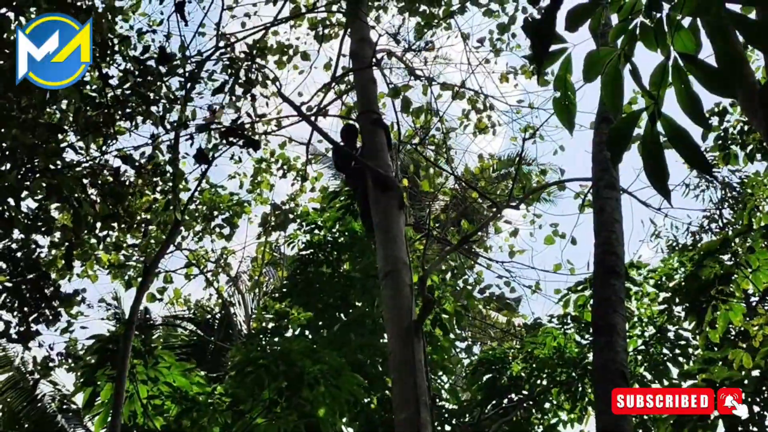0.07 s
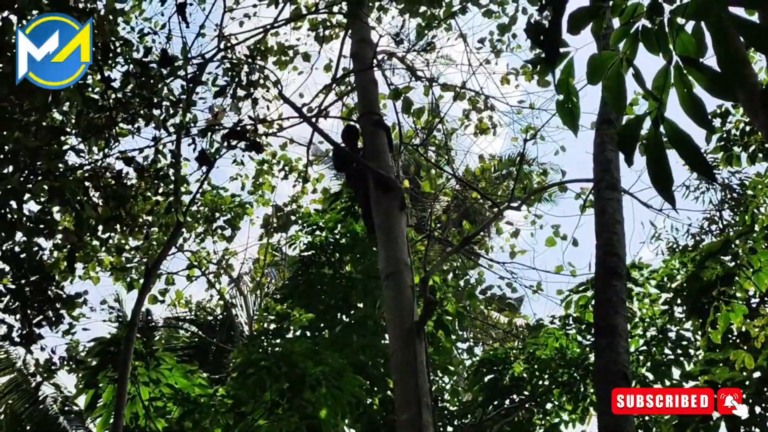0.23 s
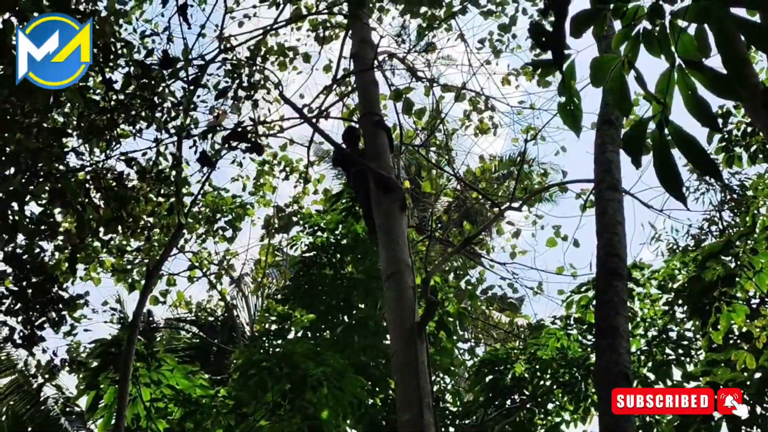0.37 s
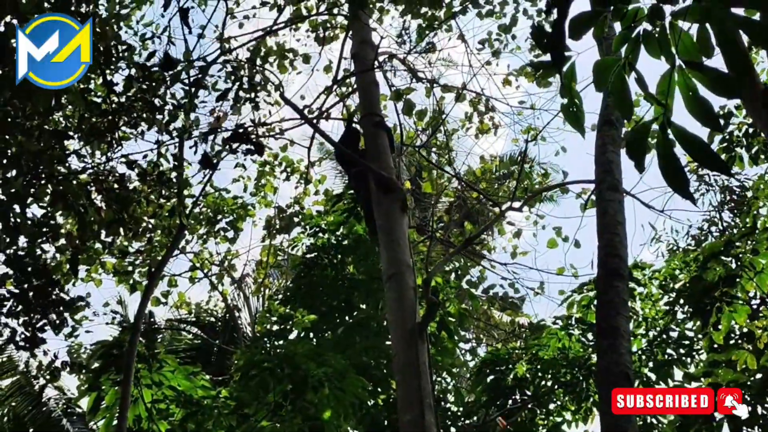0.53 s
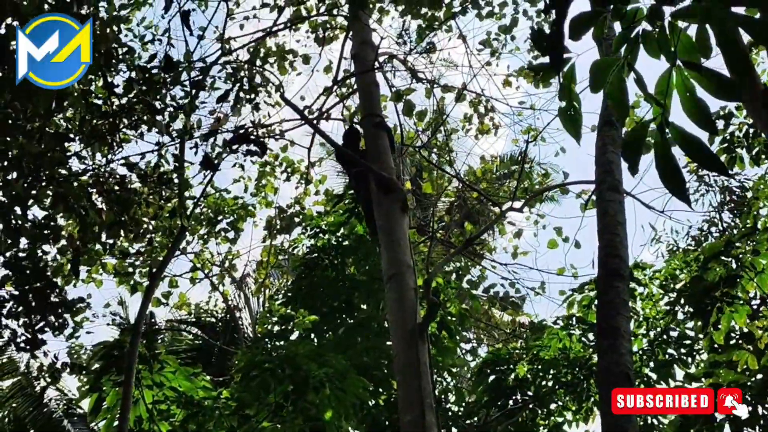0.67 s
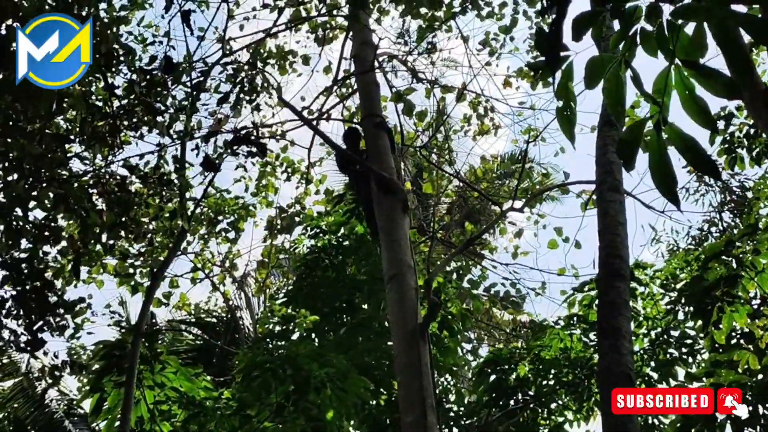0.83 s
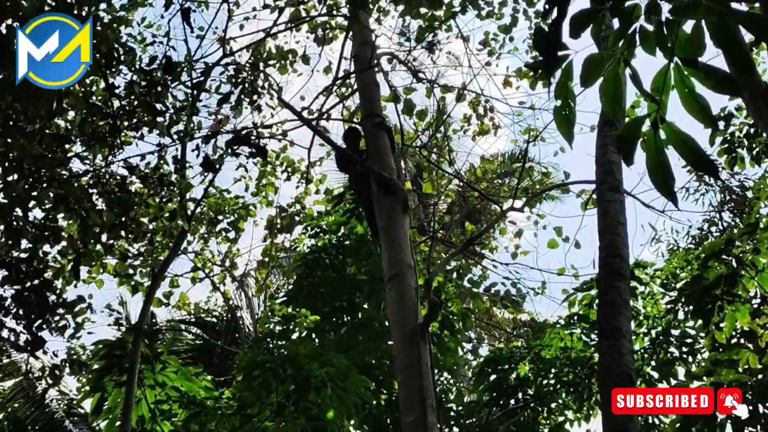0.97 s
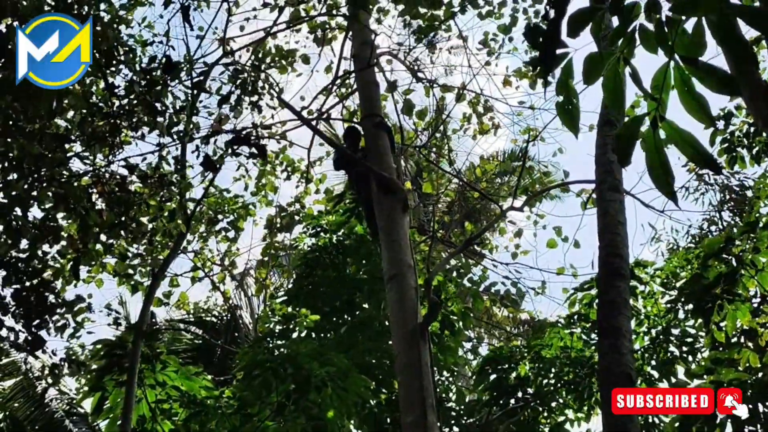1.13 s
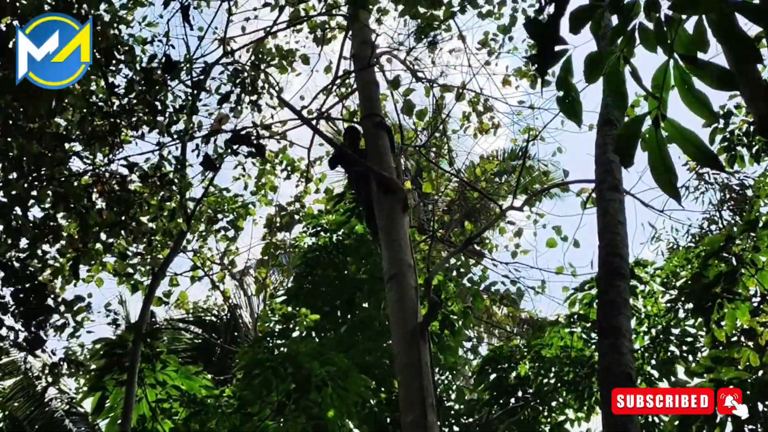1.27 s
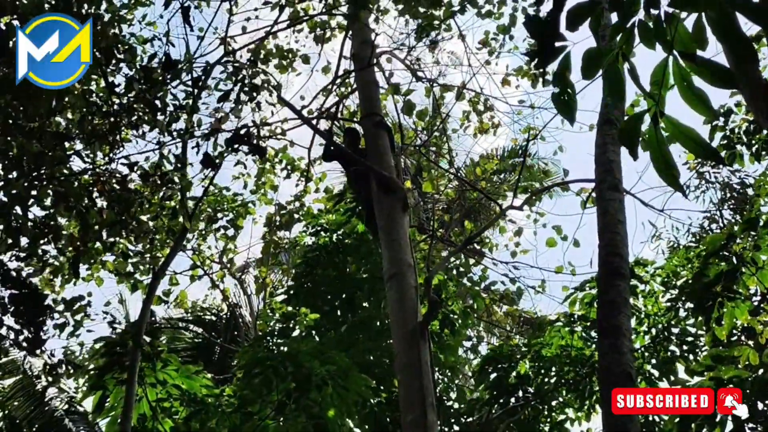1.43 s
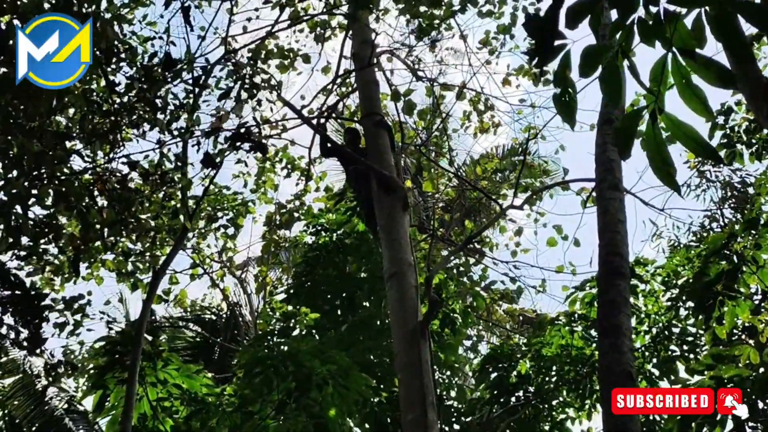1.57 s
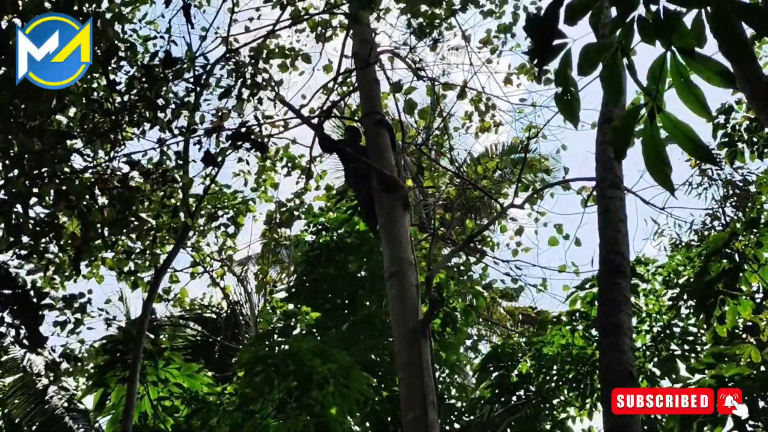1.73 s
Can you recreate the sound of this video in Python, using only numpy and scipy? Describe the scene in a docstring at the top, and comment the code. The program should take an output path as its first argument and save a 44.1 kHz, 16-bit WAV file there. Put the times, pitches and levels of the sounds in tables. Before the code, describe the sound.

Two sharp, woody blade chops in a tree, the first much louder and slightly clipped, each with a forest echo tail; steady high cicada hiss, faint leaf rustle and twig ticks, on a handheld stereo recorder.

```python
"""A blade chops twice into a limb in a tree: the trunk booms, branch and limb knock, fibres crack.
Each knock, early echo included, is decaying modes and a noise burst; the forest adds a diffuse noise tail.
Around it, coloured noise makes cicada hiss, far air, rustling leaves and a low rumble.
Twigs and leaves tick faintly as short noise bands; something taps the right microphone port once.
The handheld recorder has two unlike ports and clips on strong peaks."""
import sys
import numpy as np
from scipy import signal
from scipy.fft import rfft, irfft, next_fast_len
from scipy.io import wavfile
from scipy.ndimage import uniform_filter1d, map_coordinates

SR = 44100
rng = np.random.default_rng(int(sys.argv[2]) if len(sys.argv) > 2 else 0)


def to_wav(s):
    """Save 16-bit WAV."""
    ch = np.atleast_2d(s).T  # columns
    pcm = np.round(np.clip(ch, -1, 1) * 32767)  # PCM
    wavfile.write(sys.argv[1], SR, pcm.astype(np.int16))


def boost(x):
    """Linear amplitude factor 10**(x/20) for a level x in decibels (scalar or array-like)."""
    u = np.asarray(x, float) / 20
    return 10 ** u


N = 79380  # samples, 1.8 s

# Knocks of blade on wood in two blows; rows .2413 and .2445 are the first blow's early echo.
# Each row: start in seconds, then levels of trunk, thick branch, thin limb and crack in dB.
KNOCKS = [(0.2031, -65, -28, -27, -39), (0.2105, -56, -18, -17, -26), (0.213, -27, -4.5, -15.5, -7.5),
          (0.2153, -28, -6, -16, -10.5), (0.2214, -49, -31, -11.5, -12.5), (.2320, -18, -30, -24, -16),
          (0.2413, -22.5, -19.5, -34, -28), (.2445, -37, -16.5, -26, -25), (0.934, -41, -42, -23.5, -50),
          (0.9422, -26, -26, -11.5, -38), (.9462, -17, -20.5, -10, -7), (0.9496, -22, -16, -16.5, -14),
          (0.9584, -15, -21.5, -16, -22)]


def unit(x):
    """Scale to rms 1."""
    return x / np.sqrt(np.mean(x ** 2) + 1e-20)


def along(points, hz):
    """Read a curve of (Hz, value) points on a log frequency axis."""
    f, v = np.transpose(points)
    return np.interp(np.log(hz + 1), np.log(f + 1), v)


def level(rows):
    """Gain per sample from (seconds, dB) rows."""
    s, db = np.transpose(rows)
    return boost(np.interp(np.arange(N) / SR, s, db))


def wobble(rate):
    """A smooth random curve with rate knots a second."""
    knots = rng.standard_normal(int(N * rate / SR) + 4)
    return map_coordinates(knots, [np.arange(N) * rate / SR])


def filtered(x, response):
    """Multiply the spectrum of x by a response of frequency, without phase shift."""
    n = x.shape[-1]
    m = next_fast_len(n + 8192)  # room for the filter's ringing
    return irfft(rfft(x, m) * response(np.fft.rfftfreq(m, 1 / SR)), m)[..., :n]


def spread(pair, colour, alike):
    """Two unrelated signals, as mid and side, become a coloured left and right of given likeness."""
    def mid_side_gains(hz):
        turn = np.arccos(np.clip(along(alike, hz), -1, 1)) / 2
        return boost(along(colour, hz)) * [np.cos(turn), np.sin(turn)]

    mid, side = filtered(pair, mid_side_gains)
    return np.array([mid + side, mid - side])


def rush(colour, patchy_db, grit=0):
    """Stereo noise of rms 1 with patches of random gain in time and frequency, plus optional grit."""
    # Likeness of the two ports in diffuse sound. Each row: Hz, left-right correlation.
    port_likeness = [(60, 0.12), (180, 0.85), (540, 0.35), (1630, -0.048), (4880, 0.22), (14700, -0.16)]
    z = signal.stft(rng.standard_normal((2, N)) + grit, nperseg=512)[2]
    field = rng.standard_normal(z.shape[1:])
    field = uniform_filter1d(uniform_filter1d(field, 6, 0), 10, 1)
    patchy = signal.istft(z * boost(patchy_db * unit(field)), nperseg=512)[1][:, :N]
    return unit(spread(patchy, colour, port_likeness))


def add(out, s, sound):
    """Mix a short stereo sound in at s seconds."""
    k = round(s * SR)
    out[:, k:k + sound.shape[-1]] += sound


def cicadas():
    """Many tymbals all around blur into a bright noise hiss, grained by sparse random clicks."""
    # Each row: time in seconds, level in dB before the lift below.
    hiss_level = [(0.0, -38.5), (0.932, -37.5), (1.142, -38), (1.688, -37.5), (1.8, -39)]
    # Spectrum of the hiss. Each row: Hz, relative dB per Hz.
    hiss_colour = [(3650, -36), (6200, -35.5), (7960, -17.5), (8800, -5.5), (9960, -0.5), (11100, -4.5),
                   (11800, -6), (13000, -30.5), (14100, -15), (14600, -37), (14900, -65), (15100, -68)]
    clicks_per_s, click_share = 3100, 0.16  # share: click rms against noise rms
    clicks = (rng.random((2, N)) < clicks_per_s / SR) * rng.standard_normal((2, N))
    hiss = rush(hiss_colour, patchy_db=1.24, grit=click_share * unit(clicks))
    swell = boost(2 + 0.63 * wobble(11.16))  # 2 dB lift, slightly unsteady
    return level(hiss_level) * swell * hiss


def far_air():
    """Air in the distance: patchy noise with a gently wavering level."""
    # Each row: time in seconds, level in dB.
    air_level = [(0, -46.5), (.2, -47.5), (.5, -43.5), (.68, -46.5), (.9, -45.5), (1.25, -45), (1.5, -47),
                 (1.74, -45.5), (1.8, -45)]
    # Each row: Hz, relative dB per Hz.
    air_colour = [(100, -60), (180, -2.5), (350, 1.5), (600, -7), (1000, -6.5), (1600, -4.5), (2400, -8.5),
                  (3700, -18), (5600, -14.5), (6200, -41), (7000, -11), (9000, -66)]
    return level(air_level) * boost(0.1 * wobble(22)) * rush(air_colour, patchy_db=3.5)


def rustle():
    """Leaves rustle: a band of patchy noise with a fast-wavering level."""
    # Each row: time in seconds, level in dB.
    leaf_level = [(0, -48.5), (.2, -48), (.55, -48.5), (.61, -48), (.67, -41.5), (.76, -51), (.9, -45),
                  (1.3, -50), (1.42, -51), (1.5, -42.5), (1.58, -46.5), (1.68, -50), (1.75, -44.5),
                  (1.8, -44)]
    # Each row: Hz, relative dB per Hz.
    leaf_colour = [(1500, -67), (2600, -6), (3700, 0.5), (4600, -1), (5600, -5), (6200, -22), (7000, -62)]
    return level(leaf_level) * boost(1.4 * wobble(39.6)) * rush(leaf_colour, patchy_db=2.5)


def rumble():
    """A low, unsteady rumble of bass noise."""
    # Each row: time in seconds, level in dB before the lift below.
    rumble_level = [(0.0, -47), (0.074, -48.5), (0.164, -51.5), (0.234, -38.5), (0.35, -62), (0.37, -52),
                    (0.43, -51), (0.46, -60), (0.546, -50), (0.616, -55), (0.636, -50), (0.856, -49.5),
                    (0.996, -50.5), (1.042, -52), (1.088, -49), (1.168, -55.5), (1.208, -53), (1.8, -53.5)]
    # Each row: Hz, relative dB per Hz.
    rumble_colour = [(15, -30), (30, -0.5), (60, -7.5), (80, 0.5), (105, -8), (150, -4.5), (220, -25),
                     (320, -40)]
    swell = boost(5 + 1.7 * wobble(14.3))  # 5 dB lift, unsteady
    return level(rumble_level) * swell * rush(rumble_colour, patchy_db=-0.66)


def ticks():
    """Twigs and leaves tick: short bursts of noise in a band around a pitch."""
    # Each row: start in seconds, level in dB, centre of the band in Hz.
    twig_ticks = [(.079, -39, 4000), (.131, -36, 3600), (.6484, -31, 4700), (.82, -39, 3500),
                  (.8645, -35, 2200), (.9033, -31, 4500), (1.4486, -38, 2200), (1.5519, -32, 3400),
                  (1.6250, -34, 3660), (1.7275, -37, 4100)]
    t60_s, rise_s, top_hz = .035, .001, 5600
    width_octaves, left_db = .7, -3
    out, t = np.zeros((2, N + SR)), np.arange(SR // 10) / SR
    for s, db, hz in twig_ticks:
        def band(f):
            bell = np.exp(-(np.log2((f + 1) / hz) / width_octaves) ** 2)
            return bell / (1 + (f / top_hz) ** 20)

        noise = unit(filtered(rng.standard_normal((2, len(t))), band)) * boost([[left_db], [0]])
        add(out, s, (1 - np.exp(-t / rise_s)) * boost(db - 60 * t / t60_s) * noise)
    return out[:, :N]


def ring(modes, t, rough=0):
    """Modes ring together, each a decaying sine; rough scatters their phases, in cycles."""
    rise_s, scatter_db = 0.001, 4.5
    total = 0
    for hz, db, t60 in modes:
        mode_db = db + scatter_db * rng.uniform(-1.04, 1)
        total = total + boost(mode_db - 60 * t / t60) * np.sin(2 * np.pi * (hz * t + rough * rng.random()))
    return (1 - np.exp(-t / rise_s)) * total


def chops():
    """Every knock, and the early echo, is ringing trunk, branch and limb plus a decaying noise crack."""
    # Modes of trunk, thick branch and thin limb. Each row: Hz, level in dB before scatter, t60 in seconds.
    trunk_modes = [(157, -7, 0.16), (243.7, -7.5, 0.096), (292, 1, 0.082)]
    branch_modes = [(331, -4, 0.13), (356.3, 0, 0.071), (491, -5.5, 0.05), (535.3, -12, 0.098)]
    limb_modes = [(592, -9, 0.052), (772, -7, 0.042), (974, -5, 0.038), (1091.6, -1.5, 0.058),
                  (1296, -6.5, 0.022), (1486, -6.5, 0.029), (1670, -7.5, 0.029), (1973, -10, 0.038),
                  (2040, -14, 0.014)]
    # Spectrum of cracking fibres. Each row: Hz, relative dB per Hz.
    fibre_colour = [(880, -8.5), (1500, -5), (2300, -18.5), (2760, -2), (3760, 1.5), (6040, -22.5),
                    (7180, -27), (8380, -67), (10900, -15.5), (15100, -33)]
    # The tree stands to the right. Each row: Hz, left minus right in dB.
    blow_side = [(600, 0.8), (1400, 0.7), (2400, -5.5), (4400, -6), (8000, 0)]
    crack_t60_s, crack_likeness, limb_rough = 0.033, 0.19, 0.85
    out, t = np.zeros((2, N + SR)), np.arange(SR // 4) / SR
    for s, trunk_db, branch_db, limb_db, crack_db in KNOCKS:
        noise = rng.standard_normal((2, len(t)))
        crack = unit(spread(noise, fibre_colour, [(1000, crack_likeness)])) * boost(-60 * t / crack_t60_s)
        boom = boost(trunk_db) * ring(trunk_modes, t)
        knock = boost(branch_db) * ring(branch_modes, t) + boost(limb_db) * ring(limb_modes, t, limb_rough)
        add(out, s, boost(crack_db) * crack + boom + knock)
    return filtered(out[:, :N], lambda hz: boost(along(blow_side, hz) * [[.5], [-.5]]))


def forest():
    """Trunks and leaves scatter sound back: a diffuse noise tail after each row of KNOCKS, in its colour."""
    # Decay of the tail. Each row: Hz, t60 in seconds.
    tail_t60 = [(100, 0.75), (350, 0.47), (1000, 0.8), (2500, 0.66), (3200, 0.6), (3900, 0.89),
                (4800, 0.64), (8000, 0.79), (14000, 0.53)]
    # Each row: Hz, gain in dB.
    tail_colour = [(60, -8), (150, 0), (350, -1.5), (700, -9.5), (1200, -9.5), (2200, -10), (3700, -9.5),
                   (5000, -9.5), (6200, -24.5), (8000, -28.5), (11000, -15), (14000, -32)]
    # Each row: Hz, left-right correlation.
    tail_likeness = [(100, 1), (400, 0.84), (1400, 0.067), (4000, 0.0066)]
    gap_s, rise_s = 0.0054, 0.0033
    grain_db, grain_s = 2, .004  # single trunks stand out of the tail
    out = np.zeros((2, N + 2 * SR))
    for s, trunk_db, branch_db, limb_db, crack_db in KNOCKS:
        hz, t, z = signal.stft(rng.standard_normal((2, SR)), SR, nperseg=256)
        blow_db = along([(150, trunk_db), (360, branch_db), (1100, limb_db), (3000, crack_db)], hz)
        decay_db = 60 * t / along(tail_t60, hz)[:, None]
        tail = signal.istft(z * boost(blow_db[:, None] - decay_db), SR, nperseg=256)[1]
        age = np.arange(tail.shape[1]) / SR
        grain = boost(grain_db * rng.standard_normal(SR))[(age / grain_s).astype(int)]
        tail = tail * grain * (1 - np.exp(-age / rise_s))
        add(out, s + gap_s, spread(tail, tail_colour, tail_likeness))
    return out[:, :N]


def tap():
    """Close to the right port: a fast-dying sine click, then a small thud one click cycle later."""
    start_s, left_db = .7566, -29
    click_db, click_hz, click_t60_s = -6, 1140, 0.0036
    thud_db, thud_hz, thud_t60_s = -16.5, 248, 0.028
    out, t = np.zeros((2, N + SR)), np.arange(SR // 20) / SR
    click = boost(click_db - 60 * t / click_t60_s) * np.sin(2 * np.pi * click_hz * t)
    thud_phase = 2 * np.pi * thud_hz * np.maximum(t - 1 / click_hz, 0)
    thud = boost(thud_db - 60 * t / thud_t60_s) * np.sin(thud_phase)
    add(out, start_s, (click + thud) * boost([[left_db], [0]]))
    return out[:, :N]


def scene():
    """All sources together, as they reach the microphones."""
    background = cicadas() + far_air() + rustle() + rumble()
    return background + ticks() + chops() + forest() + tap()


def band_limit(x):
    """A steep low-pass at the top of the band."""
    return signal.sosfilt(signal.butter(12, 15270, fs=SR, output="sos"), x)


def record(dry):
    """Two unlike ports colour left and right at constant total power; then clipping and a low cut."""
    # Each row: Hz, left minus right in dB.
    port_balance = [(60, 3), (250, -1.5), (1000, -2.5), (2200, -1.5), (3500, -5.5), (4400, -14),
                    (5700, -7.5), (6150, 18), (6500, 43), (8250, 51), (8600, 20), (9100, 7), (11600, -6),
                    (14700, 16)]
    clip_top, clip_hard, low_cut_hz = 1.03, 12, 61  # a harder clip has a sharper knee

    def port_gains(hz):
        return np.sqrt(2 / (1 + boost(2 * along(port_balance, hz) * [[-1], [1]])))

    heard = filtered(dry, port_gains)
    clipped = heard / (1 + np.abs(heard / clip_top) ** clip_hard) ** (1 / clip_hard)
    mix = filtered(clipped, lambda hz: hz ** 2 / (hz ** 2 + low_cut_hz ** 2))
    return band_limit(mix)


dry = scene()
out = record(dry)
to_wav(out)
```